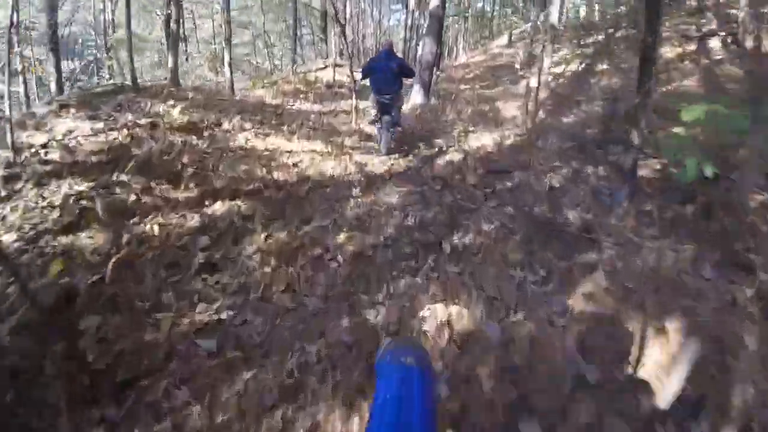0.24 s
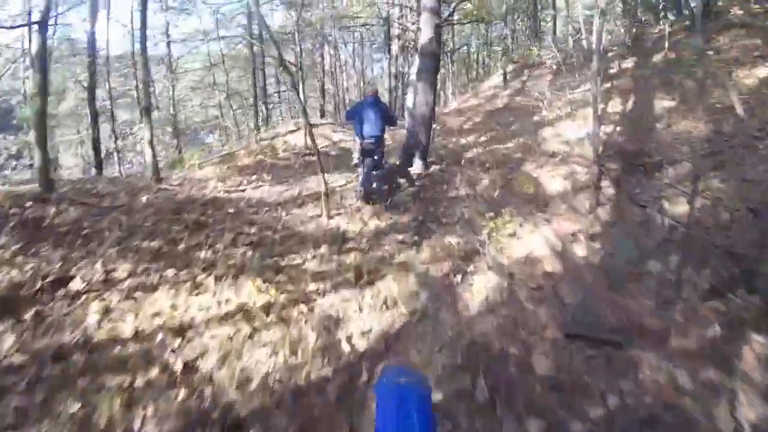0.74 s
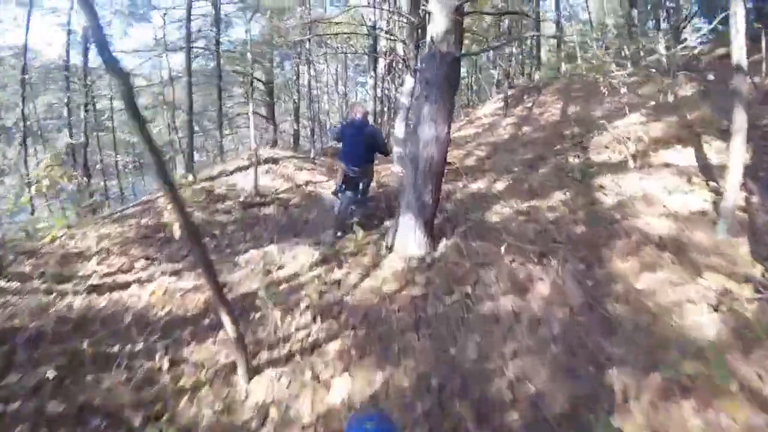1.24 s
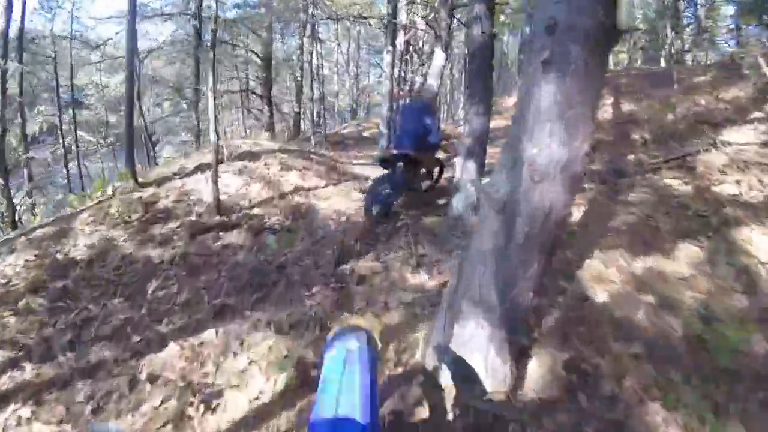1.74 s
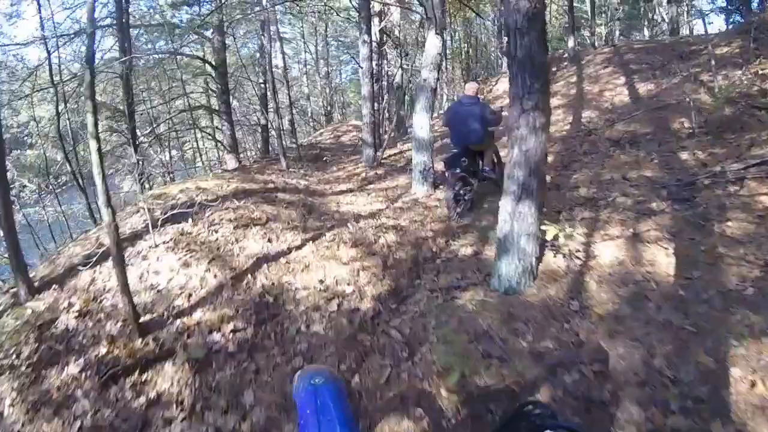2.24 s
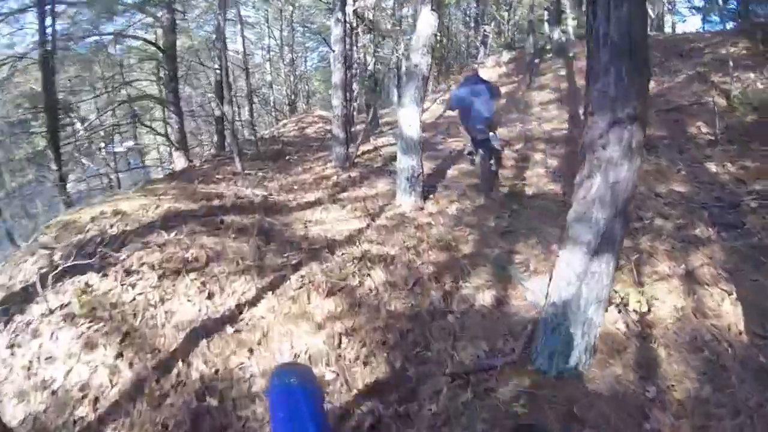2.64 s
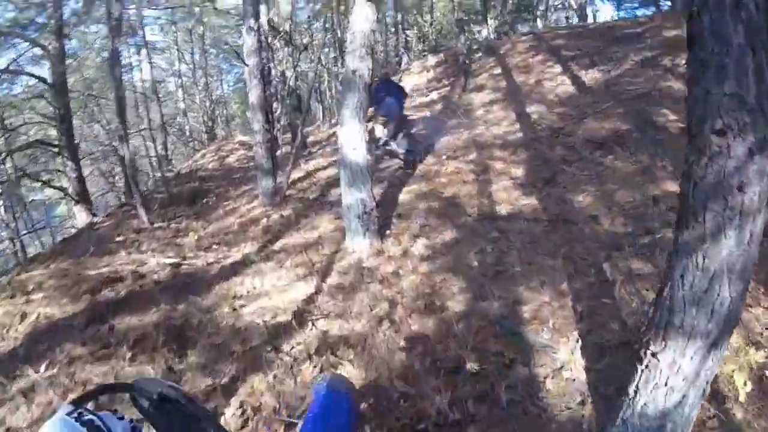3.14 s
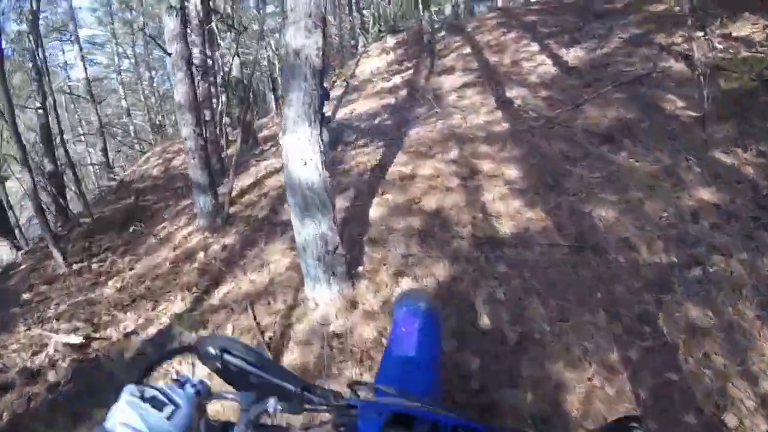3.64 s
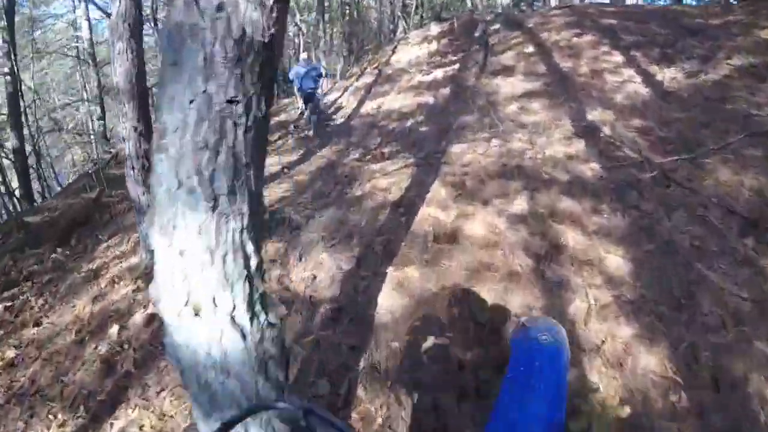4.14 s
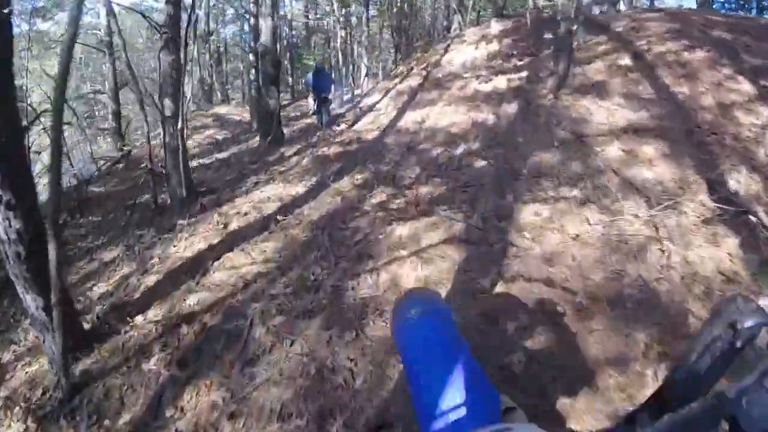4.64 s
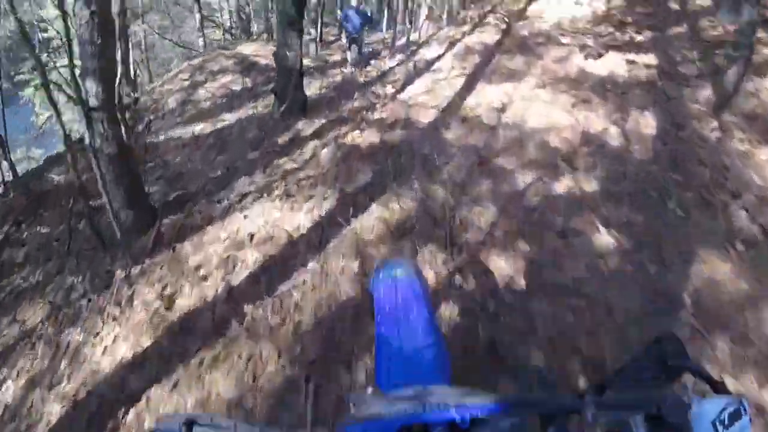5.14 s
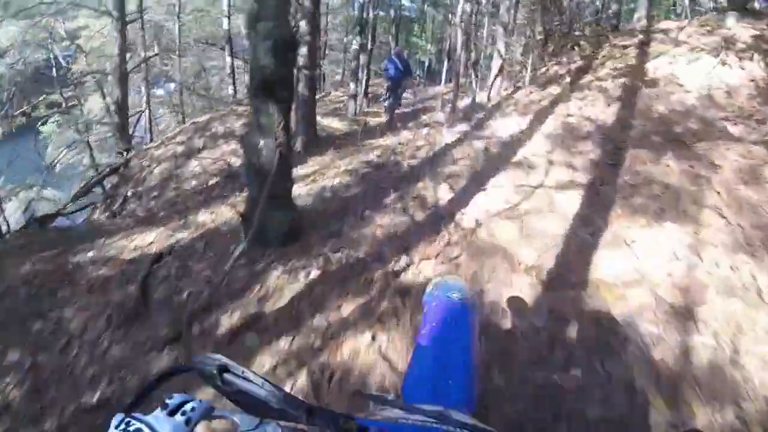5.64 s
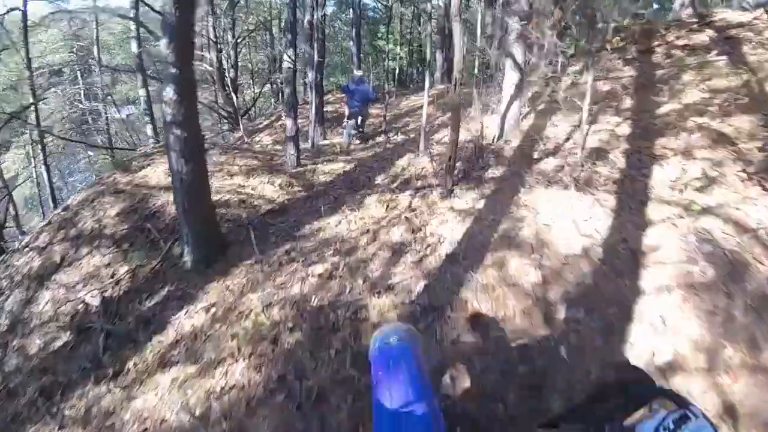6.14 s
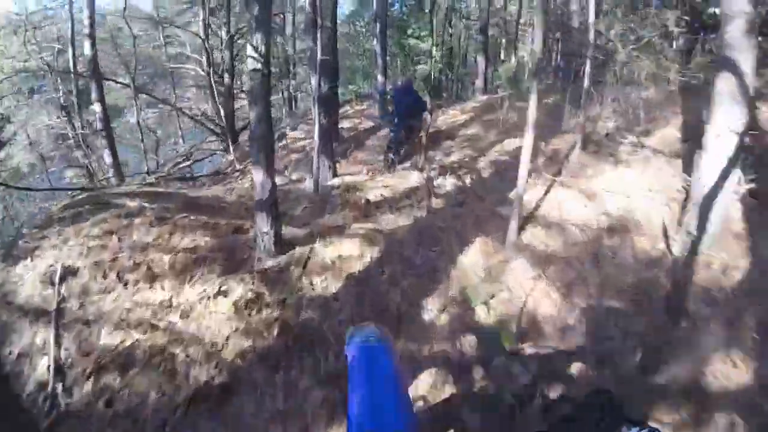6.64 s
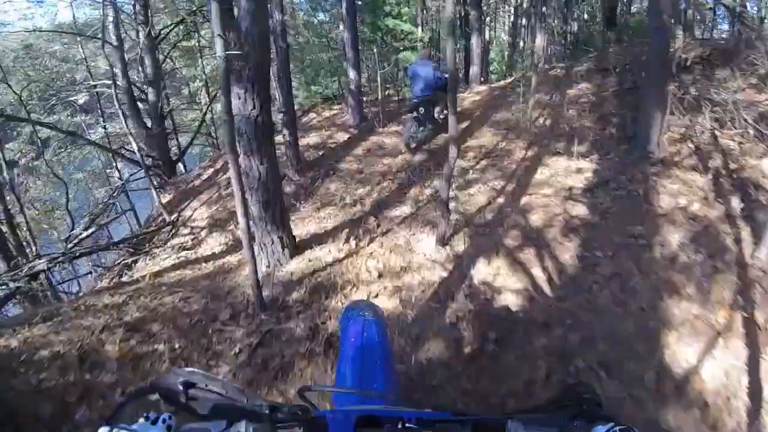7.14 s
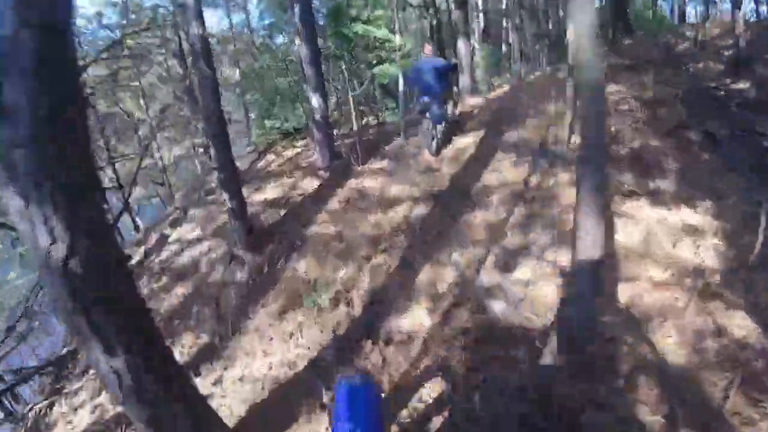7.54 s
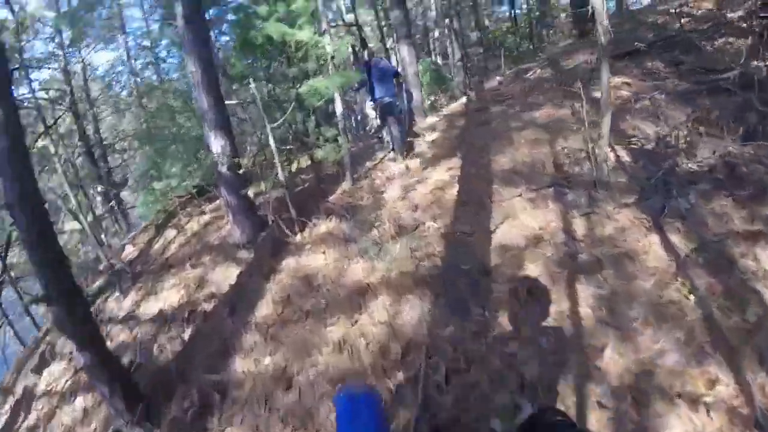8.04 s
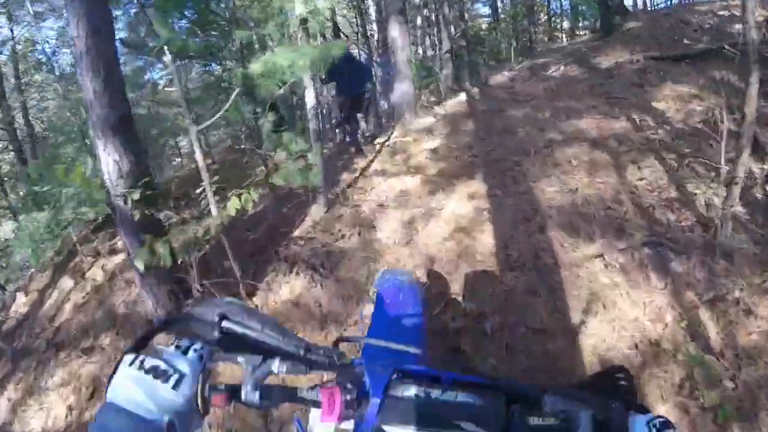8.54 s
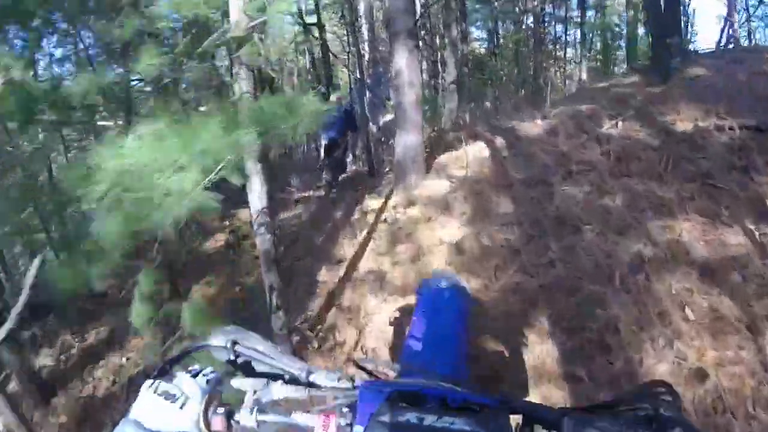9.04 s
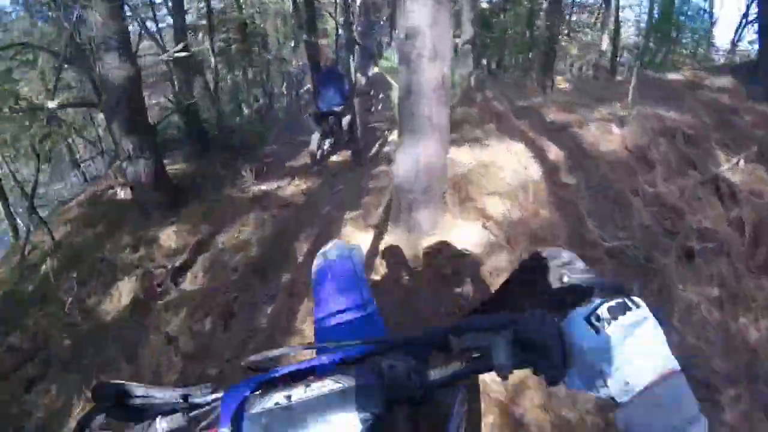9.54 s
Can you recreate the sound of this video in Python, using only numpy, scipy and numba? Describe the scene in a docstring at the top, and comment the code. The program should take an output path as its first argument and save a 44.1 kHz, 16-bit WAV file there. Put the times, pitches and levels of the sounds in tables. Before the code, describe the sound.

Heard from a rider's helmet, a two-stroke dirt bike fires raggedly with scattered pops, then races briefly into a hoarse scream and drops back. A second, longer double surge follows, then the revs sink through more popping to a low, throaty burble. A fainter bike buzzes ahead, dry leaves crackle and air rumbles softly outdoors in the woods.

```python
"""A two-stroke dirt bike climbs a leafy forest trail, heard from the rider's helmet.
It opens with ragged firing and scattered pops, then races at about 3.5 s and again from 5.2 to 5.6 s.
After that it slows, popping again near 6.1 to 6.7 s and 8 s, and ends at low revs.
Each firing rings the airbox, exhaust and metal through filters; gas and leaves are shaped noise.
All along, a second bike runs ahead, dry leaves crackle and air rumbles; now and then the chassis clacks."""
import sys
import numpy as np
from scipy import signal
from scipy.fft import rfft, irfft
from scipy.io import wavfile
from scipy.ndimage import uniform_filter1d
from numba import njit

SR = 44100
rng = np.random.default_rng(int(sys.argv[2]) if len(sys.argv) > 2 else 0)


def dump_mix(stems):
    """Bounce the given channels to the path in sys.argv[1] as a 16-bit WAV at rate SR."""
    frames = np.atleast_2d(stems).T  # one column per channel
    limited = np.clip(frames, -1, 1)  # hard clip at full scale
    pcm = np.round(limited * 32767).astype(np.int16)
    wavfile.write(sys.argv[1], SR, pcm)


N = 431298
T = np.arange(N) / SR
TAPS = 4096  # length of every filter, in samples


def amp(db):
    """Turn decibels into a plain factor."""
    return 10 ** (np.asarray(db) / 20)


def unit(x):
    """Scale to rms 1."""
    return x / np.sqrt(np.mean(x ** 2))


def curve(table, at):
    """Read the columns of a time table at the given times, with straight lines between its rows."""
    s, *columns = np.transpose(table)
    return np.array([np.interp(at, s, c) for c in columns])


def response(points):
    """Short ring of unit energy with the given spectrum, starting as promptly as it can."""
    hz, db = np.transpose(points)
    f = np.maximum(np.fft.rfftfreq(TAPS, 1 / SR), 1)
    # beyond the listed pitches the level falls 20 dB an octave, for two octaves at most
    outside = np.maximum(np.log2(f / hz[-1]), 0) + np.maximum(np.log2(hz[0] / f), 0)
    level_db = np.interp(np.log(f), np.log(hz), db) - 20 * np.minimum(outside, 2)
    # folding the cepstrum makes the filter minimum phase
    cepstrum = irfft(np.log(amp(level_db)))
    cepstrum[1:TAPS // 2] *= 2
    cepstrum[TAPS // 2 + 1:] = 0
    h = irfft(np.exp(rfft(cepstrum)))
    return h / np.linalg.norm(h)


def ring(x, h):
    """Let every sample of x set off the response h."""
    return signal.fftconvolve(x, h)[:N]


def clicks(times, sizes):
    """Impulses, each shared between two neighbouring samples."""
    at = np.clip(times * SR, 0, N - 2)
    i = at.astype(int)
    return np.bincount(i, sizes * (1 - at + i), N) + np.bincount(i + 1, sizes * (at - i), N)


def puffs(times, sizes, decay_s):
    """A burst of turbulence at each time, with the energy of an impulse of that size."""
    t = T[:TAPS]
    fade = (np.exp(-t / decay_s) * (1 - np.exp(-10 * t / decay_s))) ** 2
    power = ring(clicks(times, sizes ** 2), fade / fade.sum())
    return np.sqrt(np.maximum(power, 0)) * rng.standard_normal(N)


def walk(rate):
    """Slow random wander with a spread near 1; a higher rate wanders faster."""
    k = int(SR / rate)
    steps = np.repeat(rng.standard_normal(N // k + 1), k)
    return unit(uniform_filter1d(uniform_filter1d(steps, k), k)[:N])


def scatter(x, decay_s, count=7):
    """Dense reflections from frame, rider and ground; their pattern shifts as the rider moves."""
    t = T[:TAPS]
    fade = np.exp(-t / decay_s) * (1 - np.exp(-10 * t / decay_s))
    paths = rng.standard_normal((count, TAPS)) * fade
    weights = np.array([walk(4) for _ in paths])
    weights = weights / np.linalg.norm(weights, axis=0)
    return sum(w * ring(x, h / np.linalg.norm(h)) for w, h in zip(weights, paths))


def disperse(x, spread_s, count=400):
    """Paths of many lengths smear each pulse in time and leave its colour."""
    f = np.fft.rfftfreq(TAPS, 1 / SR)
    delay = spread_s * np.interp(f, np.linspace(0, SR / 2, count), rng.random(count))
    return ring(x, irfft(np.exp(-2j * np.pi * np.cumsum(delay) * f[1])))


@njit
def resonance(x, hz, width):
    """Band-pass with a moving centre, gain 1 there."""
    y, band, low = np.empty(len(x)), 0., 0.
    for i in range(len(x)):
        g, k = np.tan(np.pi * hz[i] / SR), width / hz[i]
        v = (band + g * (x[i] - low)) / (1 + g * (g + k))
        band, low, y[i] = 2 * v - band, low + 2 * g * v, k * v
    return y


def emphasise(x, table, width_hz):
    """Lift a moving resonance out of the sound, or push it down where its boost is negative."""
    centre_hz, boost_db = curve(table, T)
    return x + (amp(boost_db) - 1) * resonance(x, centre_hz, float(width_hz))


# colour of the steady wind: [pitch_hz, level_db]
WIND_COLOUR = [(15, -3.5), (40, -16.5), (70, -12), (120, -12.5), (250, -9), (600, -24.5), (1500, -66)]
# colour of a jolt of air on the microphone: [pitch_hz, level_db]
BUFFET_COLOUR = [(15, 2), (45, -2), (90, -2.5), (150, -3.5), (250, -10), (600, -42.5)]
# gusts and jolts at the helmet: [middle_s, length_s, level_db]
GUSTS = [(0.658, 0.027, -22.5), (0.827, 0.0082, -17), (5.096, 0.22, -33), (6.313, 0.16, -26.5),
         (7.27, 0.046, -22), (7.56, 0.11, -28), (8.751, 0.041, -27), (9.136, 0.05, -21.5)]


def wind():
    """Air tumbles round the helmet as low noise; each gust is a swell of deeper noise."""
    gusts = sum(amp(db) * np.exp(-.5 * ((T - s) / length) ** 2) for s, length, db in GUSTS)
    steady = unit(ring(rng.standard_normal(N), response(WIND_COLOUR)))
    buffet = unit(ring(rng.standard_normal(N), response(BUFFET_COLOUR)))
    return amp(-30.5 + 0.26 * walk(9.6)) * steady + gusts * buffet


# colour of the crushed leaves: [pitch_hz, level_db]
LEAF_COLOUR = [(400, -17), (900, 15), (1800, 6.5), (3000, -2.5), (5000, -9.5), (6500, -14), (8000, -32),
               (9500, -36)]


def leaves(count=3000):
    """Dry leaves crackle under the tyres: many tiny noise bursts, a few of them much stronger."""
    when, luck = rng.random((2, count))
    sizes = amp(-4 * np.log(np.maximum(luck, .01)))
    crackle = ring(puffs(when * T[-1], sizes, decay_s=0.015), response(LEAF_COLOUR))
    return amp(-38.5 + 2 * walk(5.3)) * unit(crackle)


# chassis clacks over bumps: [start_s, relative level_db]
CLACKS = [(0.4003, -17.5), (1.235, -27), (1.31, -19), (2.3844, -14), (4.063, -33), (6.112, -15.5),
          (7.942, -15.5)]
# the ring of a chassis clack: [pitch_hz, level_db]
CHASSIS = [(200, -12.5), (420, 10.5), (800, 11), (1400, -1.5), (2000, 2), (3000, -8), (5000, -4),
           (6500, -11), (8000, -19.5), (9500, -19)]


def chassis_clacks():
    """Bumps make the chassis clack: short noise bursts ring its resonances."""
    s, db = np.transpose(CLACKS)
    return amp(20.5) * ring(puffs(s, amp(db), decay_s=0.023), response(CHASSIS))


# the bike ahead: [time_s, firing_rate_hz, relative level_db]
AHEAD = [(0, 61.12, -21.5), (1.4, 57.7, -28), (1.88, 72.9, -23.5), (2, 78.26, -23), (2.55, 65.52, -25.5),
         (3.1, 64.36, -28), (4, 89.6, -32.5), (6, 74.45, -35), (7.15, 52.43, -23.5), (7.55, 66.8, -27.5),
         (8.5, 57.87, -27.5)]


def bike_ahead():
    """The leading bike's tailpipe points back at us; trunks smear its firings."""
    hz, db = curve(AHEAD, T)
    turns = np.cumsum(hz) / SR
    times = np.interp(np.arange(1, int(turns[-1])), turns, T)
    # firings vary a little in time and in strength
    times = times + .0001 * rng.standard_normal(len(times))
    pulses = clicks(times, amp(2 * rng.standard_normal(len(times))))
    tailpipe = response([(55, -13.5), (75, -12.0), (140, -9.0), (220, -8.5), (420, -2.5), (600, -7.5),
                         (900, -22.0), (1800, -18.0), (3000, -49)])
    return amp(db + 0.5) * unit(ring(pulses + scatter(pulses, decay_s=0.027), tailpipe))


# crank speed in turns per second: [time_s, speed_hz]
CRANK = [(0.0, 76.2), (0.27, 82.4), (0.39, 73.7), (0.65, 81.1), (0.92, 89.9), (1.12, 72.7), (1.55, 73.7),
         (1.66, 67.1), (1.9, 72.5), (2.02, 62.3), (2.52, 58.6), (2.68, 79.8), (3.06, 63.9), (3.18, 83.3),
         (3.42, 137.4), (3.52, 181.5), (3.6, 114.9), (3.65, 91.8), (3.8, 73.7), (3.98, 67.0), (4.05, 56.5),
         (4.17, 61.6), (4.46, 64.8), (4.73, 72.1), (4.84, 68.4), (5.08, 69.5), (5.21, 89.7), (5.31, 147.4),
         (5.41, 138.6), (5.62, 174.5), (5.7, 109), (5.76, 100), (5.83, 93.5), (5.9, 88), (6.0, 82),
         (6.11, 80), (6.19, 101), (6.26, 91), (6.34, 85), (6.41, 80.5), (6.5, 95.2), (6.61, 84), (6.7, 89),
         (6.77, 84.5), (6.88, 79.3), (7.1, 77.8), (7.88, 59.5), (8.47, 63.4), (8.56, 56.7), (8.72, 60.8),
         (8.8, 55.2), (8.87, 58.0), (8.98, 53.3), (9.44, 56.5), (9.52, 48.4), (9.78, 53.5)]


def crank_hz(at):
    """Crank speed at the given times; a two-stroke can fire once every turn."""
    return curve(CRANK, at)[0]


# the rider's hand: [time_s, throttle 0-1]
THROTTLE = [(0, 0.72), (.26, 0.85), (.3, 0.32), (.78, 0.38), (.793, 0.87), (.92, 0.78), (.945, 0),
            (1.52, 0.24), (1.66, 0.55), (2.42, 0.46), (2.6, 0.88), (2.75, 0.57), (3.08, 0.46), (3.11, 0.6),
            (3.19, 0.6), (3.34, 0.74), (3.5, 0.88), (3.6, 0.56), (3.68, 0.7), (3.73, 0), (3.85, 0.46),
            (4.45, 0.81), (4.6, 0.71), (4.85, 0.83), (5.25, 0.83), (5.4, 0.75), (5.62, 0.8), (5.66, 0.28),
            (5.8, 0.23), (6.07, 0), (6.095, .45), (6.112, 0.83), (6.16, 0.96), (6.19, 0.64), (6.25, 0.13),
            (6.31, 0.17), (7, 0.33), (7.6, 0.35), (8.3, 0.12), (8.55, 0.81), (9.78, 0.74)]


def throttle_at(at):
    """How far the throttle is open at the given times."""
    return curve(THROTTLE, at)[0]


LOW_REVS_HZ = 67.9  # above this crank speed, revs change the loudness


def loudness(law, throttle, hz):
    """Level of one part in dB: it moves with the throttle, and under throttle with the revs."""
    shut, wide, per_octave = law
    return shut + throttle * (wide - shut + per_octave * np.maximum(np.log2(hz / LOW_REVS_HZ), 0))


# whirr of the engine spinning on a shut throttle: [multiple of crank speed, level_db]
OVERRUN = [(4, -5), (5, -5), (6, 0), (7, -2), (8, -7), (9, -6), (10, -5), (12, -8), (16, -11), (20, -13)]


def overrun(turns):
    """The pumping piston and gears sing on multiples of the crank speed while the throttle closes."""
    shut = 1 - throttle_at(T)
    octaves = np.minimum(np.log2(crank_hz(T) / 88), .25)  # louder with revs, up to a limit
    tones = 0
    for order, db in OVERRUN:
        tone = unit(np.sin(2 * np.pi * (order * turns + rng.random())))
        tones = tones + amp(db + 1.2 * walk(9)) * tone
    return amp(-35 + 16 * octaves) * shut ** 2 * tones


# the piston shakes the frame: [time_s, once_a_turn_db, twice_a_turn_db]
SHAKE = [(0, -43, -27), (.33, -28.5, -31.5), (.55, -39.5, -48), (1.1, -34.5, -42), (1.8, -31, -35),
         (2.4, -35, -37), (2.75, -28, -30), (3.3, -32.5, -53), (4.1, -36, -40), (4.7, -49, -30.5),
         (5.12, -29, -27.5), (5.4, -24, -76), (5.9, -37.5, -31.5), (6.6, -29.5, -38), (7.35, -31, -30.5),
         (7.8, -39, -35), (8.6, -48, -35), (9.6, -45, -54.5)]
# base level of the thump: [throttle_shut_db, wide_open_db, more per octave of revs_db]
THUMP_LAW = (-54, -46, 24)
# swings in level of the exhaust note: [time_s, level_db]
EXHAUST_LEVEL = [(0, 6.5), (.9, 1), (1.3, 3), (2.3, 4.5), (3.15, 6.5), (3.5, -1.5), (3.75, -4.5),
                 (4.4, 3.5), (5.05, 5), (5.38, 5), (5.61, 8.5), (5.68, -16.5), (6.2, 0), (7.3, -4),
                 (8.2, 8.5), (8.65, 9), (9.0, 5), (9.4, 6), (9.78, 10.5)]
THUMP_FOLLOWS_EXHAUST = 0.6  # share of those swings, in dB


def piston_shake(turns):
    """The piston shakes the bike once and twice a turn; at high revs the gas flow adds its thump."""
    once, twice = amp(curve(SHAKE, T))
    thump_db = loudness(THUMP_LAW, throttle_at(T), crank_hz(T))
    thump = amp(thump_db + THUMP_FOLLOWS_EXHAUST * curve(EXHAUST_LEVEL, T)[0])
    first = np.hypot(once, thump) * unit(np.sin(2 * np.pi * turns))
    return first + twice * unit(np.cos(2 * 2 * np.pi * turns))


# metal parts that sing along for a while: [middle_s, half_length_s, pitch_hz, width_hz, relative level_db]
WHINES = [(3.75, .2, 4850, 70, -40), (4.8, .45, 4850, 150, -36), (9.35, .45, 5370, 35, -43),
          (3.58, .14, 3050, 40, -47), (6.55, .4, 1370, 45, -38), (8.3, .35, 3010, 30, -47),
          (8.5, .25, 3835, 35, -46), (9.15, .4, 2778, 25, -47), (9.5, .3, 3150, 20, -42)]


def whines(drive):
    """Narrow metal resonances, shaken by the engine, that swell and fade."""
    t = T[:TAPS]
    out = 0
    for s, length, hz, width, db in WHINES:
        swell = np.exp(-((T - s) / length) ** 4)
        tone = np.exp(-np.pi * width * t) * np.sin(2 * np.pi * hz * t)
        out = out + amp(db) * swell * unit(ring(drive, tone))
    return out


# broad ring of the engine metal: [pitch_hz, level_db]
METAL_COLOUR = [(1800, -31.5), (2600, -10.5), (3100, -5.5), (3600, 0), (4200, 0), (4800, 6), (5400, 7),
                (5900, 3.5), (6500, 12.5), (6900, 0), (7300, -7.5), (8000, -15), (8700, -71.5)]
# longer ringing of the expansion chamber and cylinder: [pitch_hz, width_hz, relative level_db]
MODES = [(2783, 13, -19), (3020, 24, -17), (3130, 39, -15), (3950, 25, -24), (4760, 23, -18.5),
         (5450, 24, -21.5), (6270, 45, -18.5), (6170, 110, -31)]


def metal_response(modes_db):
    """Dense short resonances of the engine's metal, with a few longer modes on top."""
    t = T[:TAPS]
    modes = 0
    for hz, width, db in MODES:
        equal_energy = np.sqrt(4 * np.pi * width / SR)
        decay = np.exp(-np.pi * width * t)
        modes = modes + amp(db) * equal_energy * decay * np.sin(2 * np.pi * hz * t)
    h = response(METAL_COLOUR) + amp(modes_db) * modes
    return h / np.linalg.norm(h)


# base level of the metal: [throttle_shut_db, wide_open_db, more per octave of revs_db]
METAL_LAW = (-45, -31.5, 8)
# swings in level of the rattle, hiss and whines: [time_s, level_db]
METAL_LEVEL = [(0, 5.5), (.6, -1), (1.0, 2.5), (1.5, -1.5), (1.7, 2.5), (2.5, -0.5), (3.1, -2), (3.22, 5),
               (3.38, 5), (3.52, 1.5), (3.66, 1), (4.2, -2), (5.1, 0.5), (5.4, 2), (5.9, -1.5), (6.5, 1.5),
               (7.4, -0.5), (7.9, -0.5), (8.4, 0), (8.6, 1), (9.78, 1)]


def metal_rattle(times, hz, strength, chance):
    """Piston slap differs on every stroke, more alike at high revs; gears and chain hiss between."""
    slap = strength * amp(1.9 * chance[2])
    locked = np.interp(hz, [85, 135], [.2, .7])  # share that repeats more exactly
    rattle = scatter(clicks(times, slap * np.sqrt(locked)), decay_s=0.019)
    rattle = rattle + amp(0.5) * puffs(times, slap * np.sqrt(1 - locked), decay_s=0.022)
    gears = amp(loudness(METAL_LAW, throttle_at(T), crank_hz(T)))
    hiss = amp(-5.5) * gears * np.interp(crank_hz(T), [85, 135], [1, .65]) * rng.standard_normal(N)
    zing = ring(rattle + hiss, metal_response(modes_db=-2.5))
    zing = zing + whines(puffs(times, np.ones(len(times)), decay_s=0.021))
    return amp(curve(METAL_LEVEL, T)[0]) * zing


# strength of the wave that returns along the pipe: [time_s, share 0-1]
PIPE_ECHO = [(0, 0.85), (.8, 0.29), (3.5, 0.08), (3.9, 0.3), (4.1, 0.14), (8.7, 0.16), (9, 0.96),
             (9.78, 0.57)]
ROUND_TRIP_S = .0042


def pipe_waves(times, sizes, share=1):
    """A pressure pulse at each firing, and its two returns along the pipe."""
    echo = share * curve(PIPE_ECHO, times)[0]
    return sum(clicks(times + k * ROUND_TRIP_S, sizes * echo ** k / (1 + echo)) for k in range(3))


# colours of the bark above idle, near idle and with the pipe in tune: [pitch_hz, level_db]
BARK_COLOUR = [(400, -19.5), (580, -6), (700, 2), (870, -5.5), (1020, 2.5), (1180, -4), (1380, -2.5),
               (1850, -3), (2150, -7.5), (2500, -15), (3200, -28)]
BARK_SLOW = [(400, -26.5), (600, -12.5), (800, 1), (1000, 4.5), (1200, -6), (1380, 2), (1600, -17),
             (1950, -0.5), (2250, -10), (2600, -14.5), (3200, -21.5)]
BARK_TUNED = [(400, -6), (600, 1.5), (760, 0), (900, -5), (1020, -3), (1140, -5), (1280, -2.5),
              (1420, -2.5), (1600, 0), (1720, -1), (1850, 0.5), (2080, -4), (2300, -8.5), (2600, -19),
              (3200, -25)]
# base level of the bark: [throttle_shut_db, wide_open_db, more per octave of revs_db]
BARK_LAW = (-37.5, -22.5, 7)
# the dry snap of a stroke: [pitch_hz, level_db]
SNAP_COLOUR = [(350, -18), (520, -3.5), (740, 4.5), (900, -3), (1100, -8.5), (1380, -2.5), (1720, -2.5),
               (2000, -4.5), (2600, -25.5)]
# share of the bark that arrives as a dry snap: [time_s, share 0-1]
SNAP_SHARE = [(0, .3), (.4, .3), (.45, .65), (.93, .65), (1.05, .3), (2.4, .2), (2.54, .45), (3.1, .35),
              (3.4, .2), (4.3, .35), (5.2, .35), (5.7, .15), (6.15, .35), (7.9, .2), (8.6, .12)]
# crank speeds between which the pipe comes into tune: [start_hz, full_hz]
ON_PIPE_HZ = (110, 137)
# clean share of the bark: [idle, mid revs, on the pipe; each 0-1]
CLEAR = (.72, .64, .45)
# a ringing resonance that shifts with revs and the rider's head: [time_s, pitch_hz, boost_db]
BARK_PEAK = [(0, 1600, -10), (.55, 1690, 7), (.86, 1710, 4.5), (1.3, 1420, -2), (2.6, 1070, 6.5),
             (3.2, 1380, 5), (3.36, 1370, 6), (3.5, 1740, 7), (3.8, 1341, -2), (4.2, 1355, -1),
             (4.7, 1301, 8), (5.08, 1240, 6.5), (5.11, 1300, 13), (5.14, 1860, 10), (5.17, 1813, 12),
             (5.26, 1730, 6.5), (5.32, 1650, 11.5), (5.42, 1540, 7), (5.5, 1800, -12), (5.58, 1280, 2),
             (5.62, 1760, -9), (5.66, 1080, 4), (5.75, 944, 3), (6.16, 865, 8), (6.24, 1850, 11),
             (6.33, 1367, 4), (6.8, 1370, 3.5), (7.5, 1370, 1), (8.4, 1340, 5), (8.6, 2000, -1),
             (8.85, 1070, -1), (9.4, 1340, -2), (9.78, 1020, 5.5)]
COAST_CLEAR = 0.24  # on a shut throttle the piston pumps evenly: share of the hoarseness that goes
SNAP_LAG_S = .0018  # the exhaust port opens a moment after the firing


def exhaust_bark(times, hz, strength, shut, chance):
    """Gas bursts from the port as snap, crack and rush; at high revs the tuned pipe screams."""
    # part of each bark reaches the helmet directly, as a dry snap
    direct = curve(SNAP_SHARE, times)[0]
    snap = clicks(times + SNAP_LAG_S, strength * np.sqrt(direct))
    snap = amp(-7.0) * ring(snap, response(SNAP_COLOUR))

    # the tuned pipe screams, though no two strokes are equally strong
    tuned = np.interp(hz, ON_PIPE_HZ, [0, 1])
    strong = strength * np.sqrt((1 - direct) * tuned) * amp(1.5 * chance[0])
    cracks = clicks(times + .000022 * chance[2], strong)
    scream = .65 * disperse(cracks, spread_s=.007) + .75 * scatter(cracks, decay_s=.005)
    scream = scream + .3 * puffs(times, strong, decay_s=.006)

    # off the tuned range, a clean crack mixes with hoarse gas
    untuned = strength * np.sqrt((1 - direct) * (1 - tuned))
    clear = np.interp(hz, [55, 80, 125], CLEAR)
    clear = clear + (1 - clear) * COAST_CLEAR * shut
    blast = pipe_waves(times, untuned * np.sqrt(clear), share=0.45)  # weaker returns than in the airbox
    crack = .7 * disperse(blast, spread_s=.018) + .7 * scatter(blast, decay_s=.013)
    flow = amp(loudness(BARK_LAW, throttle_at(T), crank_hz(T)))
    rush = np.interp(crank_hz(T), ON_PIPE_HZ, [.2, .08]) * flow * rng.standard_normal(N)
    gas = .8 * puffs(times, untuned * np.sqrt(1 - clear), decay_s=.02) + rush

    above_idle = np.interp(crank_hz(T), [56, 65], [0, 1])  # near idle the bark takes another colour
    rasp = ring((crack + gas) * above_idle, response(BARK_COLOUR))
    rasp = rasp + ring((crack + gas) * (1 - above_idle), response(BARK_SLOW))
    rasp = amp(-0.12) * rasp + amp(0.5) * ring(scream, response(BARK_TUNED)) + snap
    return emphasise(rasp, BARK_PEAK, width_hz=82)


# the airbox's response to one firing, at high and at low revs: [pitch_hz, level_db]
AIRBOX_FAST = [(70, -59.5), (130, -15.5), (175, -1.5), (215, -1), (250, 1.5), (280, -2.5), (330, 3.5),
               (380, -11), (500, -31.5), (900, -48.5)]
AIRBOX_SLOW = [(100, -37), (160, -7), (190, 3.5), (218, 2), (265, -1.5), (315, 8), (345, -4), (385, -38),
               (500, -16.5), (900, -41)]
# the clean honk of the intake above idle: [pitch_hz, level_db]
HONK_COLOUR = [(380, -25), (510, -8), (620, -3.5), (760, 0), (840, -4), (980, -17), (1400, -33)]
# crank speeds between which the airbox changes, and the honk sets in: [start_hz, full_hz]
AIRBOX_SHIFT_HZ = (62.4, 76.1)
HONK_HZ = (64, 80)
HALF_TURN_SHARE = 0.16  # near idle the airbox gulps again half a turn later


def intake_boom(times, hz, airbox, honk):
    """Each intake stroke booms in the airbox; the revs shift its resonances."""
    fast = np.interp(hz, AIRBOX_SHIFT_HZ, [0, 1])
    # at low revs the intake draws a little after the exhaust port opens
    draw, slow = times + 0.00328, airbox * (1 - fast)
    gulps = clicks(draw, slow) + HALF_TURN_SHARE * clicks(draw + .5 / hz, slow)
    boom = ring(pipe_waves(times, airbox * fast), response(AIRBOX_FAST))
    boom = boom + ring(gulps, response(AIRBOX_SLOW))
    honks = clicks(times, honk * np.interp(hz, HONK_HZ, [0, 1]))
    return boom + ring(honks, response(HONK_COLOUR))


# the exhaust's response to one firing: [pitch_hz, level_db]
EXHAUST_COLOUR = [(150, -34), (270, -18), (335, -6), (375, -1.5), (435, 0), (475, -3), (520, -11),
                  (600, -16), (740, -29), (1400, -55)]


def exhaust_pipe(times, strength, unsteady):
    """Pulses travel the pipe and return; uneven burning adds reflections and sputter."""
    waves = pipe_waves(times, strength, share=0.97)  # returns almost as strong as in the airbox
    uneven = scatter(clicks(times, strength * unsteady), decay_s=0.031)
    sputter = puffs(times, .25 * strength * unsteady, decay_s=.012)
    return ring(0.69 * waves + 1.15 * uneven + sputter, response(EXHAUST_COLOUR))


# strongest resonance of the note, moving with throttle and gas heat: [time_s, pitch_hz, boost_db]
FORMANT = [(0, 228, 5), (.28, 240, 4), (.35, 450, 10), (.46, 245, 5), (.9, 255, 9.5), (1.3, 270, 3.5),
           (1.55, 420, -9.5), (1.66, 205, 6), (1.95, 212, 5.5), (2.08, 390, 2), (2.3, 390, 3),
           (3.03, 395, 0.5), (3.1, 215, 10), (3.191, 255, 15), (3.3, 440, 4), (3.4, 255, 3.5),
           (3.52, 345, 4), (3.66, 240, 9.5), (3.9, 220, 12.5), (4.05, 285, 8), (4.3, 320, 2),
           (4.38, 400, -9), (4.551, 215, 8.5), (4.999, 280, 2.5), (5.14, 295, 6.5), (5.2, 400, 5),
           (5.24, 210, 5), (5.33, 290, 3), (5.44, 285, 5), (5.5, 465, 3), (5.58, 490, 2.5),
           (5.611, 345, -1), (6.05, 250, 8), (6.15, 260, 7.5), (6.45, 260, 5.5), (6.55, 480, 12.5),
           (6.67, 255, 7), (6.8, 567, 10), (6.95, 539.3, 12), (7.1, 465, 13), (7.5, 400, 11), (8.3, 405, 7),
           (8.6, 300, 3.5), (8.8, 340, 6), (9.019, 295, 5.5), (9.2, 220, 7.5), (9.78, 215, 5.5)]


def engine_note(boom, pipe):
    """Intake and exhaust together, coloured by one strong moving resonance."""
    return emphasise(amp(-2.5) * boom + amp(-1.5) * pipe, FORMANT, width_hz=89)


# irregular pops between misfires: [start_s, throttle 0-1, relative level_db]
POPS = [(.301, 0.73, -2), (.333, 0.9, -6), (.397, 0.9, 0.5), (.7945, 0.97, -2), (.959, 0.88, -2.5),
        (1.019, 0.74, -1), (1.107, 0.8, -1.5), (1.165, 0.77, -3.5), (1.231, 0.74, 0), (1.313, 0.86, -4),
        (1.381, 0.9, -2), (1.46, 0.8, 0.5), (1.542, 0.6, -2), (1.64, 0.63, 0), (2.386, 0.77, -1),
        (3.01, 0.64, 0.5), (3.087, 0.64, 6), (3.672, 0.85, -6.5), (6.11, 0.98, 0), (6.425, 0.97, 2.5),
        (6.462, 0.82, -0.5), (6.632, 0.92, 1.5), (6.681, 0.98, 0), (6.725, 1, -6), (7.861, 0.8, -5),
        (7.943, 0.57, -1.5), (8.011, 0.6, -0.5), (8.098, 0.8, -4), (8.128, 0.6, -5), (8.186, 0.6, -3),
        (8.267, 0.72, -2.5), (8.332, 0.6, -1.5), (8.367, 0.57, -3), (8.428, 0.64, 3.5)]
# runs of pops, the engine catching only every few turns:
# [start_s, first_gap_s, gap_change_s per pop, pop count, throttle 0-1, relative level_db, fade_db per pop]
STUTTERS = [(.4518, .0394, -.0004, 9, .92, 1.5, -.1), (2.5385, .1195, 0, 5, .48, 5.5, -1.4)]


def pops():
    """Irregular pops and regular runs of them: times, throttle and level of each."""
    rows = list(POPS)
    for start, gap, change, count, throttle, db, fade in STUTTERS:
        for k in range(count):
            rows.append((start + k * gap + k * (k - 1) / 2 * change, throttle, db + k * fade))
    return np.transpose(rows)


# base levels of intake and exhaust: [throttle_shut_db, wide_open_db, more per octave of revs_db]
AIRBOX_LAW = (-38, -10, 2)
HONK_LAW = (-52, -19.5, 0)
EXHAUST_LAW = (-34, -16.5, -1.5)
# what unburnt mixture adds to a pop: [airbox_db, honk_db, exhaust_db, bark_db, metal_db]
POP_EXTRA = (-1.5, -9, 4, -0.5, 3.5)
# burning is most uneven at part throttle: [throttle 0-1, unsteadiness 0-1]
UNSTEADY = [(0, .25), (.2, .3), (.4, .55), (.72, .15)]
BARK_FOLLOWS_EXHAUST = 0.12  # share of the exhaust note's swings, in dB
SECOND_FIRING_DB = -4  # a pop is two firings, one turn apart


def firings(turns):
    """One firing a turn, replaced by pops where they fall: times, five levels and unsteadiness."""
    intake_laws, outlet_laws = (AIRBOX_LAW, HONK_LAW), (EXHAUST_LAW, BARK_LAW, METAL_LAW)
    starts, pop_throttle, pop_level = pops()
    pop_hz = crank_hz(starts)
    # a pop burns a full charge, whatever the airbox is drawing
    first = [loudness(law, pop_throttle, pop_hz) for law in intake_laws]
    first += [loudness(law, 0.85, pop_hz) for law in outlet_laws]
    first = np.array(first) + pop_level + np.array(POP_EXTRA)[:, None]
    pop_times = np.concatenate([starts, starts + 1 / pop_hz])

    times = np.interp(np.arange(turns[-1]), turns, T)
    # drop the regular firings within half a turn of a pop
    nearest_s = np.abs(times[:, None] - pop_times).min(axis=1)
    times = times[nearest_s * crank_hz(times) > .5]
    throttle, hz = throttle_at(times), crank_hz(times)
    db = np.array([loudness(law, throttle, hz) for law in intake_laws + outlet_laws])
    db = db + np.outer([0, 0, 1, BARK_FOLLOWS_EXHAUST, 0], curve(EXHAUST_LEVEL, times)[0])
    unsteady = np.concatenate([curve(UNSTEADY, throttle)[0], np.zeros(len(pop_times))])
    levels_db = np.hstack([db, first, first + SECOND_FIRING_DB])
    return np.concatenate([times, pop_times]), levels_db, unsteady


COAST_SCATTER_DB = 3  # with the throttle shut some strokes catch and others hardly fire


def engine():
    """Firings drive airbox, exhaust, bark and metal; the turning crank adds shake and whirr."""
    turns = np.cumsum(crank_hz(T)) / SR
    times, db, unsteady = firings(turns)
    hz = crank_hz(times)
    chance = rng.standard_normal((len(times), 3)).T
    times = times + .00007 * unsteady * chance[0]
    shut = 1 - throttle_at(times)
    # pops have no unsteadiness, so their strength does not vary here
    spread_db = 2.0 * unsteady + COAST_SCATTER_DB * shut ** 2 * (unsteady > 0)
    # the last factor keeps each level the same however often the engine fires
    airbox, honk, exhaust, bark, metal = amp(db + spread_db * chance[1]) * np.sqrt(SR / hz)
    boom = intake_boom(times, hz, airbox, honk)
    note = engine_note(boom, exhaust_pipe(times, exhaust, unsteady))
    rasp = exhaust_bark(times, hz, bark, shut, chance)
    zing = metal_rattle(times, hz, metal, chance)
    return note + rasp + zing + piston_shake(turns) + overrun(turns)


def scene():
    """All sources together, as one channel."""
    return (wind() + leaves() + chassis_clacks() + bike_ahead() + engine())[None]


def record(dry):
    """Round the highest peaks and cut the treble above 8400 Hz."""
    ceiling = .85
    rounded = dry / (1 + (dry / ceiling) ** 4) ** (1 / 4)
    return signal.sosfilt(signal.ellip(8, .2, 80, 8400, fs=SR, output="sos"), rounded)


dry = scene()
out = record(dry)
dump_mix(out)
```